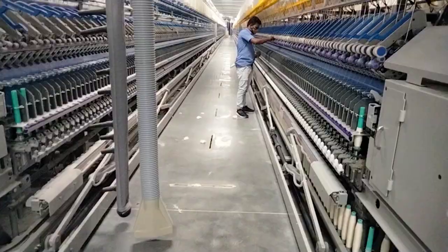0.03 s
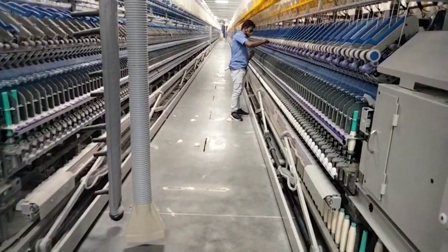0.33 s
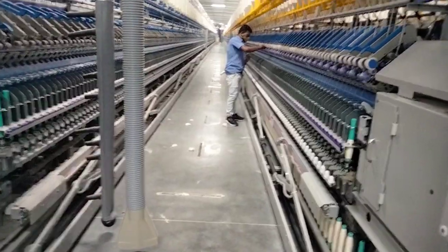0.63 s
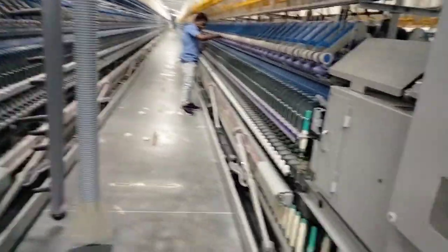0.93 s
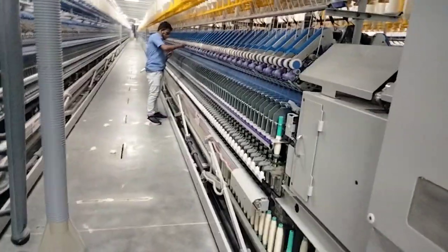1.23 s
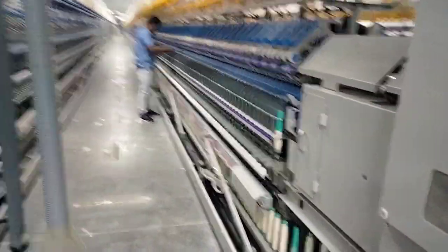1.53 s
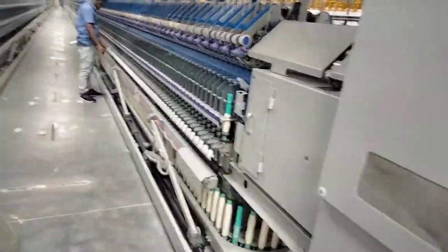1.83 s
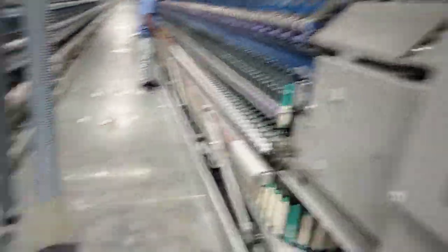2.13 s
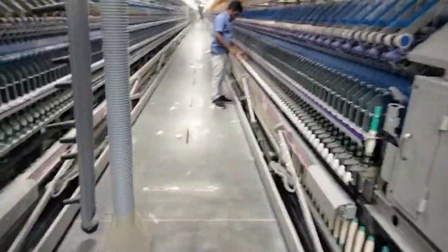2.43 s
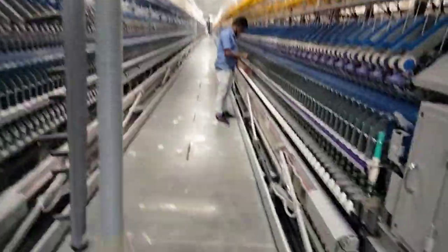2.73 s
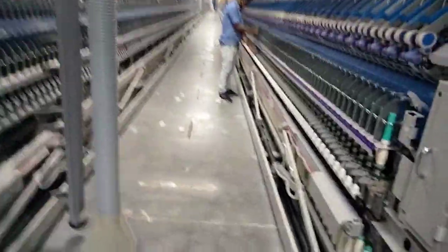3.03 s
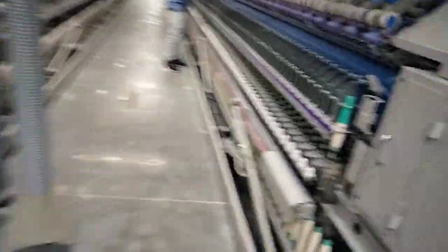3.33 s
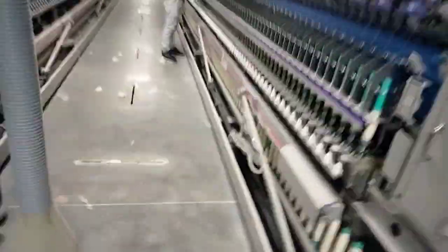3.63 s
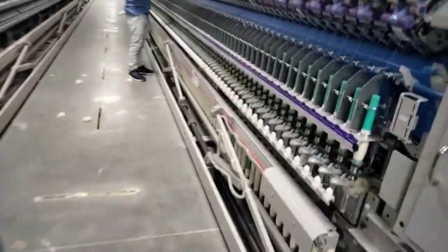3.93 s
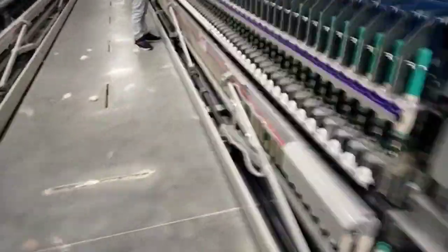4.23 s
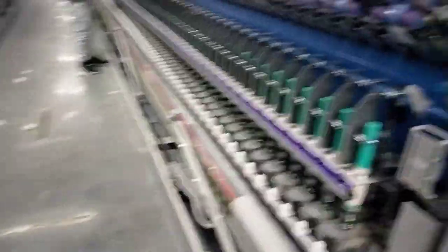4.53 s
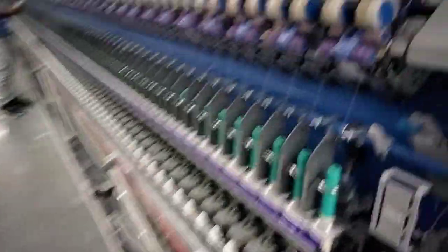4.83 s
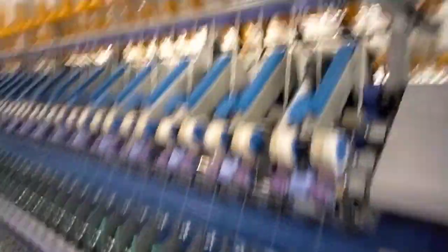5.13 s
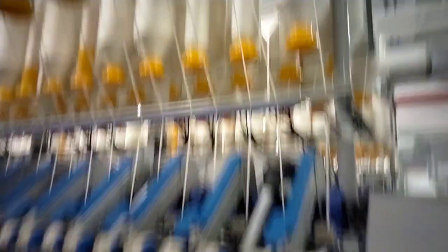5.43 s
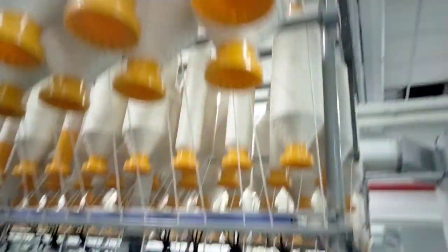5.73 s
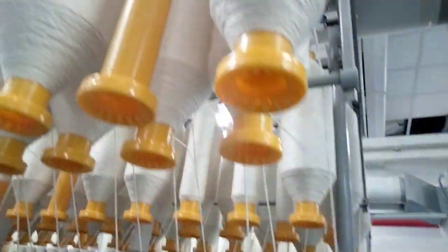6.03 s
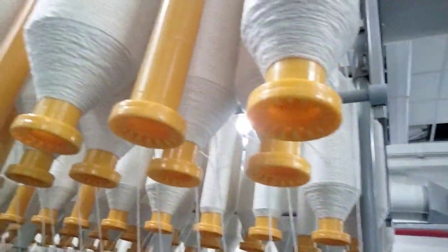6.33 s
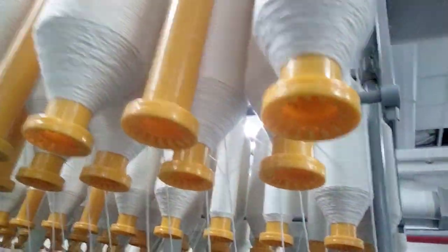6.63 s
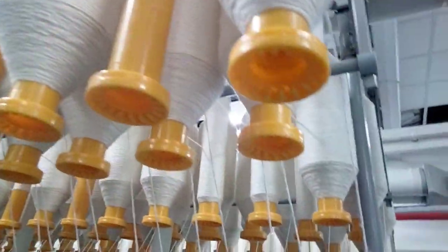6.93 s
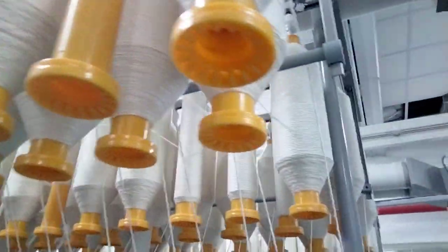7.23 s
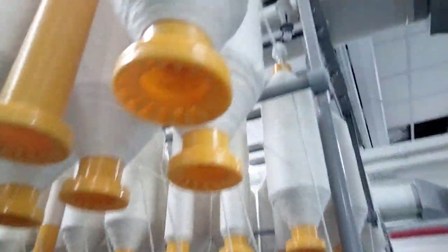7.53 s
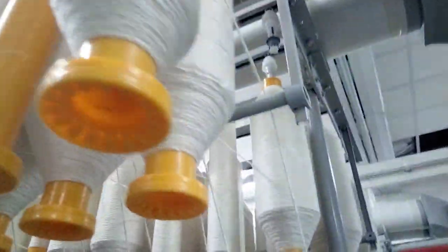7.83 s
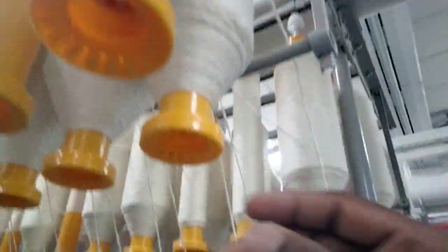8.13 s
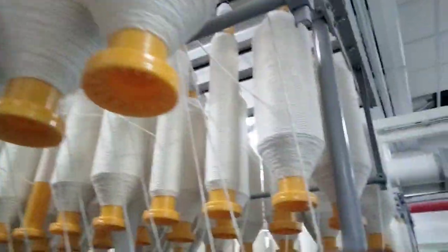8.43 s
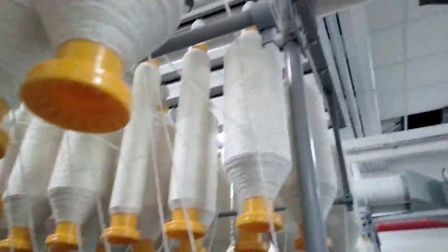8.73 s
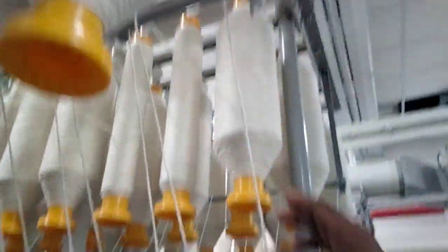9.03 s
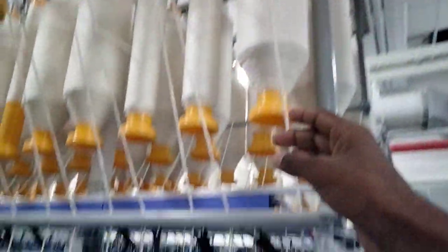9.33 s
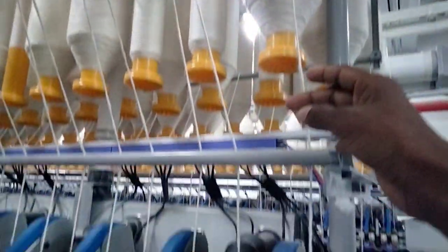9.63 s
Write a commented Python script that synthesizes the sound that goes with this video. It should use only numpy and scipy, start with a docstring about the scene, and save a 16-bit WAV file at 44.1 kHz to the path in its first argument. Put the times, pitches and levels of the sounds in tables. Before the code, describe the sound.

Spinning machines run in a big textile mill hall with a loud steady hum, whirring rollers and a bright hiss.

```python
"""Ring spinning frames run in a big mill hall, heard by one microphone carried up the aisle and lifted
to the bobbins. Groups of spindles hum at nearly equal speeds and swell in the aisle's standing waves,
over whining motors, droning drives and suction fans. Drafting rollers whirr, travellers hiss round
their steel rings and yarn sizzles through its guides. The hiss grows brighter as the rings come near."""
import sys
import numpy as np
from scipy import signal
from scipy.fft import rfft, irfft, next_fast_len
from scipy.io import wavfile

SR = 44100
rng = np.random.default_rng(int(sys.argv[2]) if len(sys.argv) > 2 else 0)


def bounce(signal):
    """Save signal as a 16-bit WAV file at the path given by the first command-line argument."""
    frames = np.transpose(np.atleast_2d(signal))
    limited = np.clip(frames, -1, 1)
    pcm = np.round(limited * 32767).astype(np.int16)
    wavfile.write(sys.argv[1], SR, pcm)


N = 427769
START_S = .94   # the microphone opens


def from_db(db):
    """Amplitude ratio of a level in decibels."""
    return np.exp(np.asarray(db) * (np.log(10) / 20))


def in_time(rows):
    """Linear interpolation of (seconds, value) points at every sample."""
    return np.interp(np.arange(N) / SR, *np.transpose(rows))


def crests(rows):
    """A sum of raised cosines. Each row: centre in seconds, length at half height in seconds, height."""
    t = np.linspace(0, N / SR, 2000)
    total = sum(height * np.cos(np.pi / 2 * np.clip((t - s) / length_s, -1, 1)) ** 2
                for s, length_s, height in rows)
    return np.interp(np.arange(N) / SR, t, total)


def drift(rate_hz):
    """Low-passed noise of unit power: a smooth random fluctuation, mostly slower than rate_hz."""
    step, settling = 100, 2000   # samples per step, steps for the filter to settle
    pole = np.exp(-2 * np.pi * rate_hz * step / SR)
    white = rng.standard_normal(N // step + settling + 2)
    slow = signal.lfilter([1], [1, -2 * pole, pole * pole], white)[settling:]
    slow /= np.sqrt(np.mean(slow ** 2))
    return np.interp(np.arange(N) / step, np.arange(len(slow)), slow)


def machine_noise(colour=None, tones=()):
    """Incoherent sources add in power: a unit-power band, plus peaks from like parts almost in tune."""
    size = next_fast_len(N)
    hz = np.maximum(np.arange(size // 2 + 1) * SR / size, 1)
    power = np.zeros(len(hz))
    if colour is not None:
        points_hz, points_db = np.transpose(colour)
        power = from_db(np.interp(np.log(hz), np.log(points_hz), points_db)) ** 2
        power /= power.mean()
    for centre_hz, width_hz, level_db in tones:
        peak = 1 / (1 + 2 * ((hz - centre_hz) / width_hz) ** 2) ** 2
        power += from_db(level_db) ** 2 * peak / peak.mean()
    return irfft(rfft(rng.standard_normal(size)) * np.sqrt(power), size)[:N]


def hum(pitch_hz, wander_hz):
    """Frequency modulation: a turning part sings at its speed, which wanders as the belts slip."""
    turns = np.cumsum(pitch_hz + wander_hz * drift(4)) / SR
    return np.sqrt(2) * np.sin(2 * np.pi * turns)


def spindles(waver_db=1.3):
    """Standing waves: each spindle or drive hum swells as the microphone crosses one of its antinodes."""
    # Spindle groups and main drives. Each row: part, pitch in Hz, wander in Hz.
    turning_parts = [("slow spindles", 293.2, 1.0), ("far spindles", 473, 3), ("middle spindles", 486, 4.5),
                     ("fast spindles", 501.5, 1.5), ("shaft", 148, 3), ("rollers", 205, 3),
                     ("belt", 244, .72), ("drum", 541, .72)]
    # Each entry: part, rms level between swells in dB.
    resting_db = {"slow spindles": -37.5, "far spindles": -44.5, "middle spindles": -38, "fast spindles":
                  -41.5, "shaft": -54, "rollers": -50, "belt": -40, "drum": -35.5}
    # Antinode crossings. Each row: centre in seconds, length in seconds, part, peak in dB.
    antinodes = [(1.0, 0.13, "far spindles", -19), (1.48, 0.64, "slow spindles", -26),
                 (1.67, .12, "far spindles", -25.5), (2.2, 0.37, "middle spindles", -29.5),
                 (2.3, 0.47, "shaft", -33), (2.46, 0.7, "slow spindles", -22.5),
                 (2.847, 0.28, "middle spindles", -26), (3.05, 0.58, "drum", -31),
                 (3.1, .25, "far spindles", -26), (3.322, 0.39, "middle spindles", -25),
                 (3.7, .55, "slow spindles", -28), (3.75, .45, "fast spindles", -26),
                 (3.85, .35, "belt", -34), (4.7, .9, "drum", -33.5), (4.547, 0.31, "far spindles", -27),
                 (4.87, 1.05, "slow spindles", -27.5), (5.298, 0.43, "middle spindles", -31.5),
                 (5.72, 0.34, "fast spindles", -25.5), (5.825, 0.076, "middle spindles", -19.5),
                 (6.55, .9, "rollers", -34), (6.78, 0.6, "fast spindles", -24),
                 (7.784, .26, "slow spindles", -24.5), (7.95, 0.21, "rollers", -35),
                 (8.05, 0.38, "middle spindles", -31), (8.6, 1.1, "belt", -33), (9.25, 0.61, "shaft", -33),
                 (9.503, 0.64, "slow spindles", -32)]
    out = np.zeros(N)
    for part, pitch_hz, wander_hz in turning_parts:
        swells = crests([(s, length_s, from_db(peak_db))
                         for s, length_s, name, peak_db in antinodes if name == part])
        level = np.hypot(from_db(resting_db[part]), swells)
        out += level * from_db(waver_db * drift(5.6)) * hum(pitch_hz, wander_hz)
    return out


def motors():
    """Multipath interference: hum and whine arrive from all over the hall, so each line beats and fades."""
    # Each row: frequency in Hz, width in Hz, rms level in dB.
    hums = [(48.6, 1, -45.5), (71.3, 2.5, -40), (166, 4, -46), (243, 4, -45), (471, 4, -37),
            (585.4, 2, -48), (733.5, 2, -44.5), (826.3, 2, -51), (1169.5, 5, -50)]   # shafts, belts and farther frames
    whines = [(2490, 3, -49.5), (3030, 50, -42), (3734.7, 3, -57), (3859.8, 3, -53.5), (4001, 3, -57),
              (4139.8, 3, -51), (4208.4, 3, -55.5), (4780, 150, -44.8), (7998.2, 4, -45.5),
              (12784, 15, -57)]   # motors and their inverters
    return machine_noise(tones=hums) + machine_noise(tones=whines)


def floor_and_drives(fan_swing_db, thin_db=-4.5, fill_s=.14):
    """Vibrating surfaces radiate low noise: the floor rumbles and the drives drone."""
    # Each row: frequency in Hz, relative spectral density in dB.
    rumble_colour = [(6, -20), (14, -10), (40, -11.5), (60, -7), (80, -2.5), (110, -5), (160, -1.5),
                     (210, -3.5), (250, 0), (310, -17), (600, -41)]
    drone_colour = [(150, -25), (230, -12.5), (270, -7), (310, -6.5), (345, -2), (390, -3), (480, -4),
                    (620, -21.5), (1200, -47)]
    cabinet_db = crests([(4.05, .93, 1)])   # the microphone passes the drive cabinet
    since_start = np.maximum(np.arange(N) / SR - START_S, 0)
    bass_db = cabinet_db + thin_db * np.exp(-since_start / fill_s)   # thin at first, soon filling in
    rumble = from_db(-28.5 + .015 * fan_swing_db + bass_db) * machine_noise(rumble_colour)
    drone = from_db(-27 + .36 * fan_swing_db + bass_db) * machine_noise(drone_colour)
    return rumble + drone


def suction_fans(fan_db, fan_swing_db, surge_db=.1):
    """Flow noise: a broad roar lies under the narrow tones of the fans and ducts."""
    # Each row: frequency in Hz, relative spectral density in dB.
    roar_colour = [(280, -30), (380, -13.5), (440, 3), (490, 0), (540, -7.5), (640, -5.5), (800, -5.5),
                   (880, -15), (1000, -20), (1500, -34)]
    # Each row: frequency in Hz, width in Hz, level in dB relative to fan_db.
    fan_tones = [(146, 6, -14.5), (163, 7, -12.5), (255.5, 4, -17), (285.3, 2, -11), (522, 22, -9),
                 (558, 12, -12), (606, 8, -16), (678, 17, -11.5), (795, 22, -17), (826.3, 2, -18),
                 (845, 14, -17), (921, 10, -16.5), (1310, 35, -21), (1465, 30, -21)]
    roar = from_db(-27.5 + .16 * fan_swing_db + surge_db * drift(1.7)) * machine_noise(roar_colour)
    return roar + from_db(fan_db) * machine_noise(tones=fan_tones)


def hall():
    """Level falls with distance: the end-stock fans are left behind; the low noises follow in part."""
    # Each row: time in seconds, fan level in dB.
    fan_level = [(.95, -21), (2.2, -23.5), (3.25, -22.5), (4.3, -27), (6, -29.5), (9.7, -32.5)]
    fan_db = in_time(fan_level)
    swing_db = fan_db - fan_db.mean()
    return floor_and_drives(swing_db) + suction_fans(fan_db, swing_db)


def rollers(near_db):
    """Rotation noise: drafting rollers whirr in a broad band, with tones from their gears and drives."""
    # Each row: frequency in Hz, relative spectral density in dB.
    whirr_colour = [(550, -42), (850, 0), (1000, -0.5), (1120, -0.5), (1350, 1.5), (1650, 1), (2000, -2),
                    (2400, -4), (2900, -12), (4200, -22), (8000, -36)]
    # Each row: frequency in Hz, width in Hz, level in dB relative to the whirr.
    gear_tones = [(1220, 12, -24), (1590, 20, -23), (1722, 20, -21), (2065, 25, -23), (2202, 10, -22)]
    return from_db(-27 + .036 * near_db) * panel_echoes(machine_noise(whirr_colour, gear_tones))


def panel_echoes(x, echo_db=-26, count=8):
    """Comb filtering: short echoes off the floor and steel covers interfere with the direct sound."""
    lags = (rng.uniform(.003, .025, count) * SR).astype(int)
    return x + from_db(echo_db) * sum(np.pad(x, (lag, 0))[:N] for lag in lags)


def travellers(near_db):
    """Friction excites resonance: travellers hiss and rub on their steel rings and make them sing."""
    # Each row: frequency in Hz, relative spectral density in dB.
    hiss_colour = [(1700, -16), (2600, -5), (3350, -3), (3800, -6), (4400, -7.5), (5600, -8.5), (6300, -4),
                   (7200, -2), (8200, -0.5), (9000, -2), (10000, -6), (11500, -40)]
    rub_colour = [(6500, -36), (8000, -14), (8700, -1.5), (9100, -1), (9600, 4), (10000, -2.5),
                  (10300, -16), (11500, -40)]
    # Each row: frequency in Hz, width in Hz, level in dB relative to the hiss or to the song.
    bearing_whistles = [(1840, 32, -15), (2950, 50, -22), (3035, 35, -22), (7240, 28, -23), (7480, 30, -25),
                        (7970, 60, -18.5), (8090, 40, -22), (8208, 48, -14.5), (8450, 20, -20.5)]
    ring_modes = [(9195, 62, -7.2), (9315, 30, -17), (9560, 90, -16), (9780, 65, -9.5), (9828, 42, -9),
                  (10048, 38, -16)]
    shade_db = crests([(2.74, .55, -5)])   # the microphone swings away from the rings
    ring_db = .1 * near_db + shade_db
    hiss = from_db(-25 + .63 * near_db) * machine_noise(hiss_colour, bearing_whistles)
    rub = from_db(-30.5 + ring_db) * machine_noise(rub_colour)
    song = from_db(-28.5 + ring_db) * machine_noise(tones=ring_modes)
    return hiss + rub + song


def yarn(sizzle_db):
    """Friction noise: yarn whips through its guides with a high sizzle."""
    # Each row: frequency in Hz, relative spectral density in dB.
    sizzle_colour = [(7000, -27), (10200, 2.5), (11200, -.5), (12500, -0.5), (13100, 1), (13500, 5.5),
                     (13900, 2), (14700, 0.5), (15700, -4), (18000, -7.5)]
    return from_db(sizzle_db) * machine_noise(sizzle_colour)


def frame(flutter_db=.44, chatter_db=.3):
    """Amplitude modulation: the level of the whirr, hiss and sizzle dips and lifts briefly, all at once."""
    # Nearness of the rings and yarn guides. Each row: time in seconds, sizzle level in dB.
    nearness = [(.95, -35.5), (2.0, -36), (2.8, -36), (3.7, -33.5), (4.4, -32.5), (5.7, -29.5),
                (7.0, -29.5), (8.3, -28.5), (9.7, -30.5)]
    # Each row: centre in seconds, length in seconds, level change in dB.
    dips_and_lifts = [(0.977, 0.092, 1), (1.098, 0.11, -3.5), (1.38, .14, -0.7), (1.68, .2, 0.7),
                      (1.956, 0.062, -1.5), (2.12, .14, 0), (2.613, 0.11, 0.5), (2.91, 0.11, -1.8),
                      (3.33, .08, -2.5), (3.45, 0.1, 1), (3.57, 0.091, -2), (4.0, 0.15, -0.7),
                      (5.16, 0.1, -1), (5.875, 0.11, -1.6), (6.944, 0.095, -2), (7.08, 0.14, 0.6),
                      (7.326, 0.13, -1), (7.84, 0.15, 1), (8.37, 0.12, 1), (8.6, 0.17, -1.5),
                      (9.05, .14, 1.5)]
    sizzle_db = in_time(nearness)
    near_db = sizzle_db - sizzle_db.mean()
    flutter = from_db(flutter_db * drift(7.2))   # uneven yarn tension
    chatter = from_db(chatter_db * drift(150))   # travellers skip on the rings
    whirr = rollers(near_db)
    treble = chatter * (travellers(near_db) + yarn(sizzle_db))
    return from_db(crests(dips_and_lifts)) * flutter * (whirr + treble)


def scene():
    """Superposition: all sources add at one microphone, which feeds both channels."""
    mill = spindles() + motors() + hall() + frame()
    return np.array([mill, mill])


def record(dry, opening_s=.004, cutoff_hz=15800):
    """Gating and band limiting: the microphone opens abruptly, and a steep low-pass cuts the top."""
    opened = np.clip((np.arange(N) / SR - START_S) / opening_s, 0, 1)
    low_pass = signal.ellip(12, .1, 90, cutoff_hz, fs=SR, output="sos")
    return signal.sosfilt(low_pass, dry * opened)


dry = scene()
out = record(dry)
bounce(out)
```